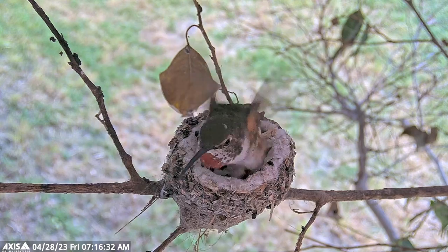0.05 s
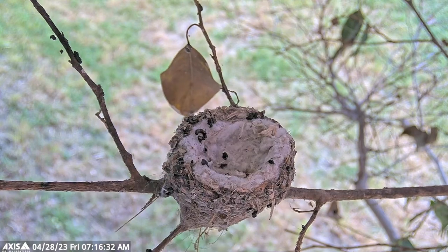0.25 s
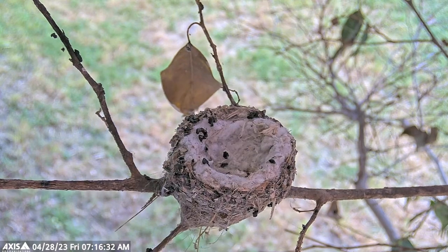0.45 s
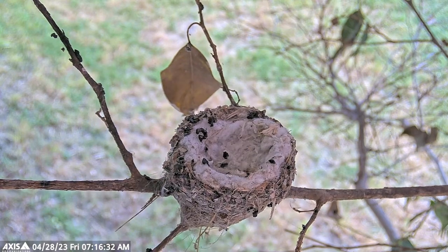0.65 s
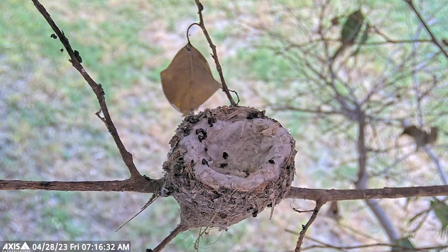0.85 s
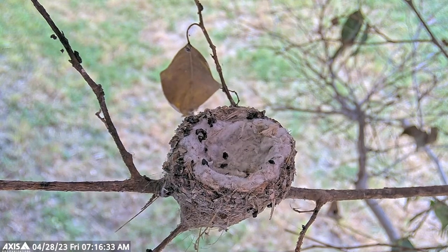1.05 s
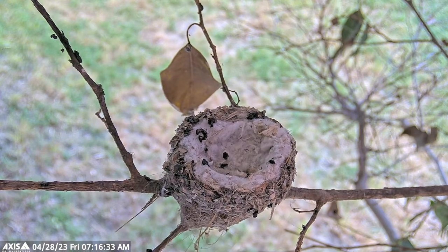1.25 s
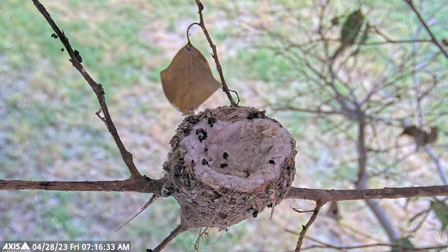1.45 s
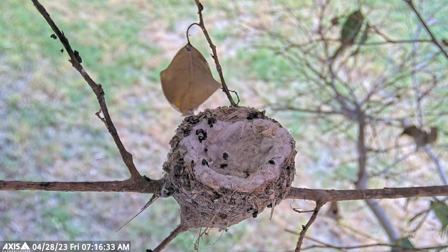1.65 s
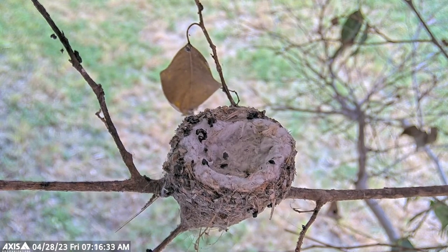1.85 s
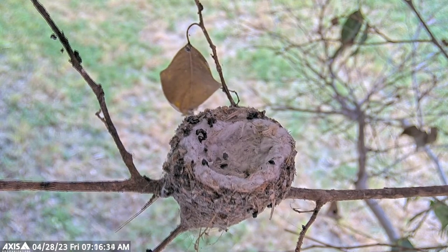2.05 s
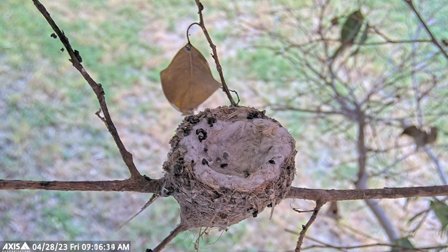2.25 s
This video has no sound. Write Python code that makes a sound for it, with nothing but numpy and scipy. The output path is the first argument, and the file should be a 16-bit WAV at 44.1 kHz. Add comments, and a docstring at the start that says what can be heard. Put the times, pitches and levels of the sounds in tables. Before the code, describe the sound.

A hummingbird's wings whirr close to the microphone as it lifts off its nest, hovers and drifts away. Distant birds chirp faintly over a low garden rumble, and a low rush of noise cuts in at the end.

```python
"""A garden, one microphone right beside a hummingbird's nest. The bird lifts off, hovers close by and
drifts away. Each wingbeat is a pressure pulse, with a feather swish on the downstroke and a puff of
air as the wing turns. Farther off, other birds call over a low rumble. Near the end a broad, low rush
of noise cuts in abruptly."""
import sys
import numpy as np
from scipy import signal
from scipy.fft import rfft, irfft
from scipy.io import wavfile
from scipy.ndimage import uniform_filter1d

SR = 44100
rng = np.random.default_rng(int(sys.argv[2]) if len(sys.argv) > 2 else 0)


def transcribe(u):
    """Save the signal u as a 16-bit wav file named by the first command-line argument.

    u: samples, shape (n,) or (channels, n), limited to [-1, 1]; the rate is SR.
    q: integer samples, one column per channel.
    """
    v = np.clip(np.atleast_2d(u).T, -1, 1)
    q = np.round(v * 32767).astype(np.int16)
    wavfile.write(sys.argv[1], SR, q)


N = 105840
T = np.arange(N) / SR


# wingbeat rate: t/s, f/Hz
BEAT_RATE = [(0.07, 48.2), (0.29, 50.32), (0.38, 53.22), (0.47, 54.18), (0.55, 54.6), (0.61, 52.31),
             (0.7, 49.6), (0.81, 48.91), (0.88, 50.34), (0.94, 51.75), (1.0, 54.78), (1.08, 54.49),
             (1.17, 56.0), (1.26, 59.0), (1.36, 53.5), (1.46, 50.3), (1.9, 52.0), (2.2, 55.0)]
def hummingbird(start_turn=.11, jitter_turns=.007):
    """Close to the microphone: every wing sound is locked to one beat, counted as one turn."""
    turns = start_turn + np.cumsum(curve(BEAT_RATE)) / SR + jitter_turns * flutter(23).real
    return feathers(turns) + air_puffs(turns) + wing_hum(turns) + wing_buzz(turns) + wingtip_hiss(turns)


# hum at the microphone: t/s, then level/dB of harmonics 1, 2, 3 and 4
HUM_LEVELS = [(.05, -90, -84, -103, -110), (.08, -88, -58, -68, -72), (.16, -62, -52, -60.5, -83),
              (.205, -48.5, -46.5, -56, -56.5), (.25, -46.5, -46.5, -59.5, -63),
              (.31, -44, -41, -50.5, -52), (.37, -35.5, -35, -45.5, -50.5), (.44, -37.5, -43.5, -52.5, -54),
              (.51, -41.5, -42.5, -54, -62.5), (.58, -49.5, -52, -62.5, -64.5),
              (.62, -46, -54, -57.5, -61.5), (.7, -46, -60.5, -60, -65), (.75, -45, -50, -57, -58.5),
              (.79, -48.5, -67.5, -62.5, -76), (.85, -44, -50.5, -54, -55), (.89, -46.5, -61, -57.5, -62),
              (.96, -47.5, -49.5, -52.5, -57), (1.01, -49.5, -59.5, -67.5, -65.5),
              (1.07, -76.5, -59.5, -66, -74), (1.18, -58.5, -69, -69.5, -73), (1.23, -57, -63, -61, -66),
              (1.29, -51, -60.5, -61, -67), (1.37, -60, -72, -69, -84.5), (1.46, -61.5, -72.5, -82, -80),
              (1.55, -76, -83, -85.5, -97.5), (1.78, -78.5, -84, -81, -91.5), (1.86, -65.5, -78, -80, -99),
              (2.05, -81, -93, -92, -104), (2.2, -65.5, -81.5, -77.5, -102)]
def wing_hum(turns, wobble_hz=22.2, waver_hz=14):
    """The low harmonics of the pressure pulses peak on the downstroke and waver in the moving air."""
    hum = np.zeros(N)
    for k in range(1, 5):
        wobble = 1 + .09 * (k - 1) * flutter(wobble_hz)  # higher harmonics are more uneven
        waver = amp(-74 - 10 * (k - .5)) * flutter(waver_hz)
        strength = amp(curve(HUM_LEVELS, column=k)) * wobble + waver
        hum += (strength * beat_harmonic(k, turns)).real
    return hum


def beat_harmonic(k, turns):
    """Harmonic k at fixed strength; the pushes and suction of the stroke set its phase."""
    downstroke = lobe(k, place=0, width=.089)
    stall_suction = (1 - hover()) * amp(-1) * lobe(k, place=.1464, width=.04)
    upstroke = hover() * amp(-8.5) * lobe(k, place=.67, width=.05)
    phase = np.angle(downstroke - stall_suction + upstroke)
    return np.sqrt(2) * np.exp(1j * (2 * np.pi * k * turns + phase))


def lobe(k, place, width):
    """Harmonic k of a smooth pressure lobe; place and width in turns."""
    return width * np.exp(-2 * (np.pi * k * width) ** 2 - 2j * np.pi * k * place)


def hover(from_s=.51, by_s=.67):
    """0 in the climb off the nest, with its hard stall; 1 while hovering."""
    return np.clip((T - from_s) / (by_s - from_s), 0, 1)


# buzz and downwash together: t/s, relative level/dB
BUZZ_LEVEL = [(.05, -99.5), (.125, -69), (.22, -68), (.31, -59), (.38, -58), (.45, -67.5), (.58, -76.5),
              (.62, -70), (.69, -72), (.755, -64.5), (.8, -82), (.855, -60), (.9, -71), (.97, -65.5),
              (1.03, -80), (1.16, -86), (1.28, -92), (1.5, -101)]
# overtones in the climb: harmonic number, level/dB relative to the fifth
OVERTONES = [(5, 0), (6, -4), (7, -6.5), (8, -6.5), (10, -13.5), (13, -29)]
# downwash spectrum: f/Hz, relative level/dB
DOWNWASH_SPECTRUM = [(15, -27), (60, -12), (140, 16), (260, 5), (400, -12), (800, -28), (3000, -60)]
def wing_buzz(turns, wobble=.32):
    """Overtones from the sharp edges of each stroke, and the turbulent downwash."""
    edges = np.zeros(N)
    for k in range(5, 14):
        dulling = amp(-(k - 5) * hover())  # the hovering stroke has softer edges
        strength = colour(OVERTONES, k) * dulling * (1 + wobble * flutter(40))
        edges += (strength * beat_harmonic(k, turns)).real
    downwash = shaped(rng.standard_normal(N), DOWNWASH_SPECTRUM)
    return amp(curve(BUZZ_LEVEL)) * (edges + downwash)


# swish and rustle together: t/s, relative level/dB
FEATHER_LEVEL = [(.09, -90), (.122, -72), (.17, -72.5), (.22, -68), (.3, -68), (.37, -65.5), (.43, -74),
                 (.5, -76.5), (.58, -79.5), (.75, -83.5), (.8, -86), (.85, -79.5), (.9, -89), (.97, -81.5),
                 (1.05, -92), (1.17, -82), (1.28, -83), (1.4, -91), (1.6, -105)]
# feather spectra: f/Hz, relative level/dB
SWISH_SPECTRUM = [(1000, -48), (3000, -16), (4800, -3.5), (6000, -1.5), (7400, -2), (8800, -21),
                  (11000, -12), (16000, -34)]
RUSTLE_SPECTRUM = [(1000, -39), (2200, -17), (3500, -3), (6000, 2), (9500, -1.5), (11000, -10),
                   (13000, -18), (16000, -31)]
# feather bursts within a beat: place/turns, width/turns, relative level/dB
SWISH_BURSTS = [(0.005, .07, .5)]
RUSTLE_BURSTS = [(.03, 0.1, -2), (0.341, 0.075, -2.5)]
def feathers(turns):
    """Air through the feathers: a swish on the downstroke and a broader rustle twice a beat."""
    swish = beat_noise(turns, SWISH_BURSTS, SWISH_SPECTRUM, floor_db=-20)
    rustle = beat_noise(turns, RUSTLE_BURSTS, RUSTLE_SPECTRUM, floor_db=-6)
    return amp(curve(FEATHER_LEVEL)) * (amp(-5.5) * swish + amp(-5) * rustle)


# puffs at the microphone: t/s, level/dB
PUFF_LEVEL = [(.06, -96), (0.128, -71), (.23, -68), (.32, -69.5), (.38, -62.5), (.45, -69), (.52, -68),
              (.59, -74), (.68, -76), (.75, -73.5), (.8, -83.5), (0.853, -67), (.9, -74.5), (.97, -68),
              (1.02, -75), (1.16, -78), (1.28, -72.5), (1.38, -83.5), (1.55, -105.5), (1.83, -88),
              (2.05, -101)]
# puff spectrum: f/Hz, relative level/dB
PUFF_SPECTRUM = [(100, -12), (300, 3.5), (480, -1), (700, -7.5), (1300, -11.5), (2200, -16.5), (4000, -18),
                 (9000, -30.5)]
# puffs within a beat: place/turns, width/turns, relative level/dB
PUFF_BURSTS = [(0.272, 0.036, 2), (0.442, 0.1, -5.5), (0.851, 0.057, -8)]
def air_puffs(turns):
    """Low puffs of air shed as the wing turns."""
    return amp(curve(PUFF_LEVEL)) * beat_noise(turns, PUFF_BURSTS, PUFF_SPECTRUM, floor_db=-5.5)


def beat_noise(turns, bursts, spectrum, floor_db, spread_db=2.6):
    """Air noise that bursts at set places in each wingbeat, no two equally strong; rms 1."""
    gate = amp(floor_db)
    for place, width, db in bursts:
        beat = np.round(turns - place).astype(int)
        strength = amp(db + spread_db * rng.standard_normal(256))[beat]
        gate = gate + strength * np.exp(-((turns - place - beat) / width) ** 2 / 2)
    return shaped(gate * rng.standard_normal(N), spectrum)


# wing tip hiss at the microphone: t/s, level/dB
TIP_LEVEL = [(.1, -92), (.13, -81.5), (.21, -80), (.28, -80), (.34, -82), (.38, -72.5), (.43, -82.5),
             (.56, -90)]
# its peak comes earlier in the beat as the bird rises: t/s, place/turns
TIP_PLACE = [(.13, 0.94), (.38, .81)]
def wingtip_hiss(turns, centre_hz=8300, fall_hz_per_turn=12020, blur_hz=2000, width_turns=.16):
    """The wing tip's band of hiss glides down into the swish of every downstroke."""
    from_peak = (turns - curve(TIP_PLACE) + .5) % 1 - .5
    hz = centre_hz - fall_hz_per_turn * from_peak
    hiss = (flutter(blur_hz) * tone(hz)).real
    gate = np.exp(-(from_peak / width_turns) ** 2 / 2)
    return amp(curve(TIP_LEVEL)) * unit(hiss * gate)


# clear whistles out in the garden: t/s, length/s, level/dB
WHISTLES = [(.003, 0.061, -70), (.203, 0.042, -70), (.388, .056, -73)]
def songbird(top_hz=3422, end_hz=2032, bend=1.7, waver_hz=444):
    """A songbird's wavering whistles, each falling ever faster in pitch."""
    song = np.zeros(N)
    for start, length, db in WHISTLES:
        fall = np.linspace(0, 1, int(length * SR)) ** bend
        hz = top_hz + (end_hz - top_hz) * fall
        waver = 1 + .36 * flutter(waver_hz)[:len(hz)]
        add(song, start, amp(db) * (waver * note(hz)).real)
    return song


# distant calls: t/s, length/s, start f/Hz, end f/Hz, blur/Hz, level/dB
FAR_CALLS = [(.0, .135, 4370, 4320, 168, -80), (.0, 0.16, 4090, 4055, 1790, -79.5),
             (0.114, 0.055, 4026, 3266, 794, -73), (0.161, 0.033, 3100, 3100, 150, -76),
             (0.311, 0.046, 4000, 3150, 810, -71), (0.344, 0.049, 3200, 3080, 163, -77.5),
             (0.434, 0.092, 3780, 4260, 910, -78), (0.517, 0.048, 4180, 3174, 760, -71),
             (0.558, 0.05, 3000, 3080, 251, -77.5), (0.598, 0.23, 4040, 3943, 890, -82),
             (0.647, .12, 2154, 1980, 40, -88.5), (1.089, 0.052, 3250, 3720, 597, -79),
             (1.133, 0.047, 5200, 4270, 200, -78), (1.172, .09, 3850, 3564, 380, -77.5),
             (1.406, 0.15, 3920, 3740, 700, -86.5), (1.509, 0.034, 3435, 3430, 1080, -76),
             (1.561, 0.034, 3900, 4000, 1420, -74.5), (1.574, 0.044, 5560, 5600, 120, -82.5),
             (1.592, 0.048, 3700, 3697, 905, -77.5), (1.618, 0.13, 3660, 3550, 600, -84),
             (1.636, 0.36, 1763, 1775, 39.4, -98), (2.133, 0.14, 3730, 3590, 607, -81.5),
             (2.284, .03, 1847, 1813, 200, -75.5)]
def far_birds():
    """Birds far from the microphone, each call a blurred, straight glide."""
    calls = np.zeros(N)
    for start, length, from_hz, to_hz, blur_hz, db in FAR_CALLS:
        hz = np.linspace(from_hz, to_hz, int(length * SR))
        add(calls, start, amp(db) * blurred_note(hz, blur_hz))
    return calls


# a nearer bird's chip: t/s, length/s, level/dB
CHIPS = [(2.282, 0.022, -68.5)]
def near_bird(start_hz=3880, top_hz=4950, rise_s=.00425):
    """A brief chip that slides up to a held note."""
    chips = np.zeros(N)
    for start, length, db in CHIPS:
        age = T[:int(length * SR)]
        hz = top_hz + (start_hz - top_hz) * np.exp(-age / rise_s)
        add(chips, start, amp(db) * blurred_note(hz, blur_hz=220))
    return chips


def in_garden(sound, echo_db, t60_s=.54):
    """The direct sound plus the garden's diffuse echo."""
    tail = rng.standard_normal(N) * np.exp(-np.log(1000) * T / t60_s)
    echo = signal.fftconvolve(sound, tail / np.linalg.norm(tail))[:N]
    return sound + amp(echo_db) * echo


# small ticks: t/s, level/dB
TICKS = [(.093, -74), (.229, -58.5), (.976, -70.5), (1.981, -78)]
def ticks(decay_s=.0029):
    """Tiny dry snaps, as bright as the feathers."""
    envelope = sum(amp(db) * (T >= start) * np.exp(-abs(T - start) / decay_s) for start, db in TICKS)
    return envelope * shaped(rng.standard_normal(N), RUSTLE_SPECTRUM)


# spectrum of the late rush: f/Hz, relative level/dB
RUSH_SPECTRUM = [(20, -9), (50, -9.5), (80, 3), (130, -8.5), (230, -11), (320, -17.5), (600, -26),
                 (1800, -30.5), (3500, -36), (5000, -32), (7500, -48.5), (15000, -79)]
def rush(start_s=2.251, rise_s=.0047, level_db=-57, fade_db_per_s=26):
    """A broad, low rush of noise cuts in abruptly and eases off."""
    age = np.maximum(T - start_s, 0)
    envelope = np.minimum(age / rise_s, 1) * amp(level_db - fade_db_per_s * age)
    return envelope * shaped(rng.standard_normal(N), RUSH_SPECTRUM)


# garden ambience: f/Hz, relative level/dB
AMBIENCE_SPECTRUM = [(10, -7.5), (22, 5), (50, -6), (120, -13.5), (220, -25.5), (400, -34.5), (600, -40.5),
                     (1800, -40), (2200, -45), (3800, -38), (6000, -44), (10000, -46.5), (15500, -49.5)]
def ambience(level_db=-65, patchy_db=2):
    """Low rumble and faint, slightly patchy hiss around the microphone."""
    cells = signal.stft(rng.standard_normal(N), nperseg=512)[2]
    patches = uniform_filter1d(rng.standard_normal(cells.shape), size=14, axis=0)  # across frequency
    patches = unit(uniform_filter1d(patches, size=12, axis=1))  # across time
    air = signal.istft(cells * amp(patchy_db * patches), nperseg=512)[1][:N]
    return amp(level_db) * shaped(air, AMBIENCE_SPECTRUM)


def whine(hz=10900, pulse_hz=62.4, level_db=-99):
    """A thin, pulsing high whine, barely there."""
    pulses = np.sin(np.pi * pulse_hz * T) ** 2
    band = (flutter(100) * np.exp(2j * np.pi * hz * T)).real
    return amp(level_db) * unit(pulses * band)


def amp(db):
    """Decibels to gain."""
    return 10 ** (np.asarray(db) / 20)


def unit(x):
    """Scales to rms 1."""
    return x / np.sqrt(np.mean(abs(x) ** 2) + 1e-20)


def curve(rows, column=1):
    """One column of a time table, at every sample."""
    rows = np.array(rows)
    return np.interp(T, rows[:, 0], rows[:, column])


def colour(spectrum, hz):
    """Gain of a spectrum table at the given frequencies."""
    f, db = np.transpose(spectrum)
    return amp(np.interp(np.log(hz + 1), np.log(f + 1), db))


def shaped(x, spectrum):
    """Filters x by a spectrum table; rms 1."""
    return unit(irfft(rfft(x) * colour(spectrum, np.fft.rfftfreq(N, 1 / SR)), N))


def flutter(width_hz):
    """Complex random wavering of the given bandwidth; rms 1."""
    noise = rng.standard_normal(2 * N).view(complex)
    pole = np.exp(-np.pi * width_hz * np.sqrt(2) / SR)
    return unit(signal.lfilter([1], [1, -2 * pole, pole * pole], noise))


def tone(hz):
    """A complex tone on a pitch curve."""
    return np.exp(2j * np.pi * np.cumsum(hz) / SR)


def note(hz):
    """A tone that swells and fades."""
    return np.sqrt(2 * abs(np.sin(np.linspace(0, np.pi, len(hz))))) * tone(hz)


def blurred_note(hz, blur_hz):
    """A note smeared into a band of noise."""
    return (note(hz) * unit(flutter(blur_hz)[:len(hz)])).real


def add(mix, start_s, sound):
    """Mixes a sound in at start_s."""
    part = mix[max(round(start_s * SR), 0):][:len(sound)]
    part += sound[:len(part)]


def scene():
    """All sources at one microphone beside the nest."""
    wings = hummingbird()
    calls = in_garden(songbird() + far_birds(), echo_db=-3)
    chip = in_garden(near_bird(), echo_db=-7)
    return (wings + calls + chip + ticks() + ambience() + whine() + rush())[None]


def record(dry, edge_hz=15700):
    """The recorder's band limit."""
    lowpass = signal.firwin(511, edge_hz, window=("kaiser", 9), fs=SR)
    return signal.oaconvolve(dry, lowpass[None], "same")


dry = scene()
out = record(dry)
transcribe(out)
```